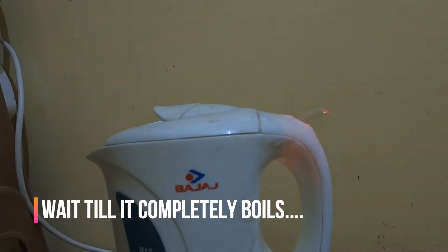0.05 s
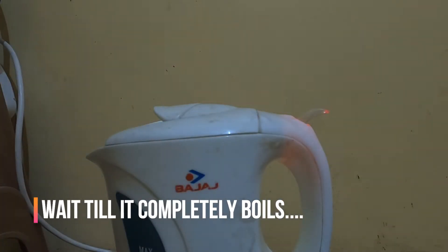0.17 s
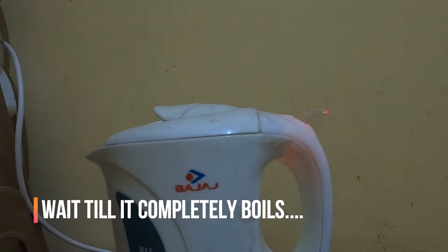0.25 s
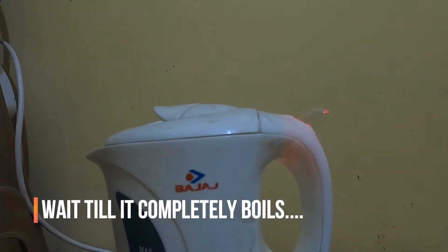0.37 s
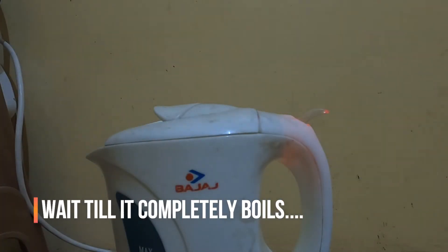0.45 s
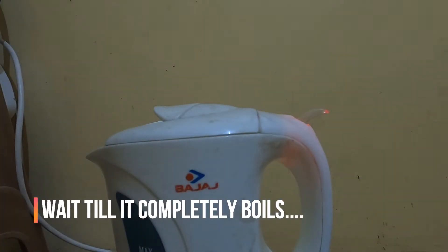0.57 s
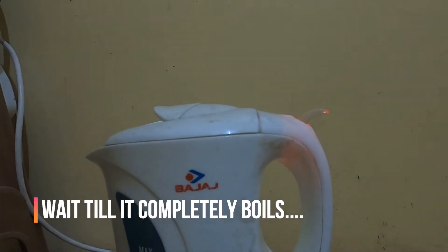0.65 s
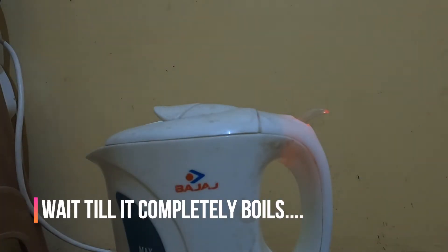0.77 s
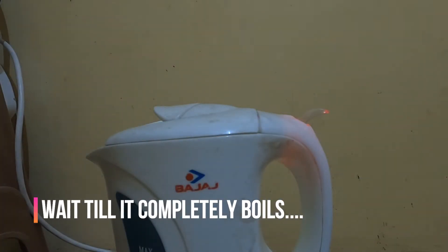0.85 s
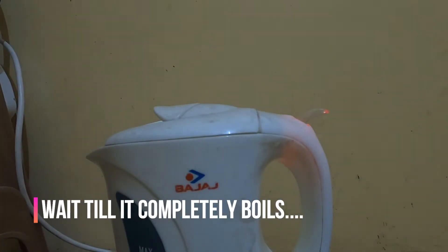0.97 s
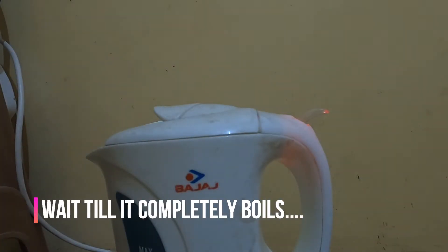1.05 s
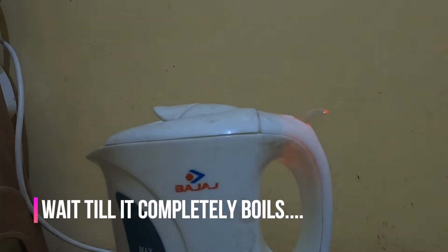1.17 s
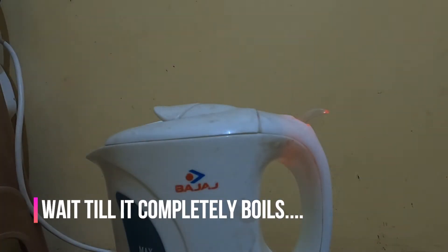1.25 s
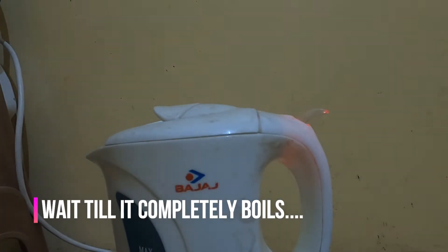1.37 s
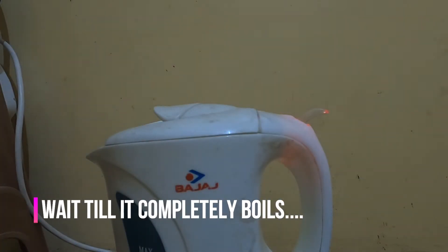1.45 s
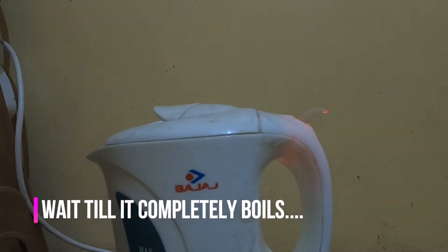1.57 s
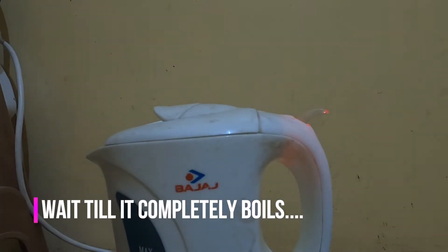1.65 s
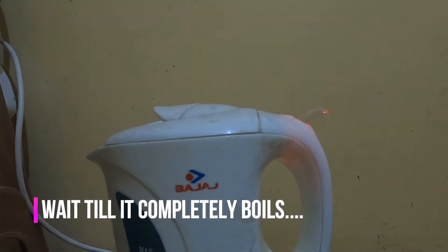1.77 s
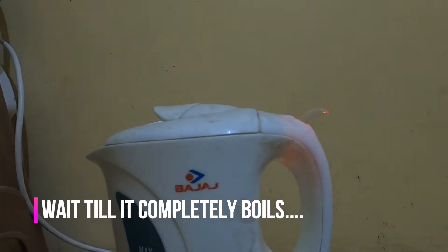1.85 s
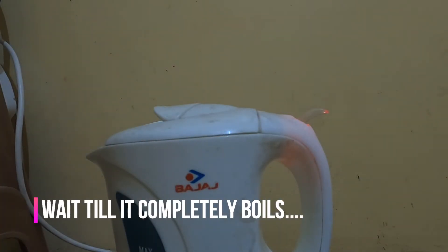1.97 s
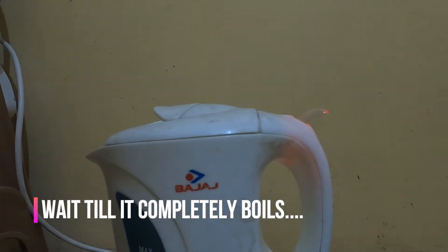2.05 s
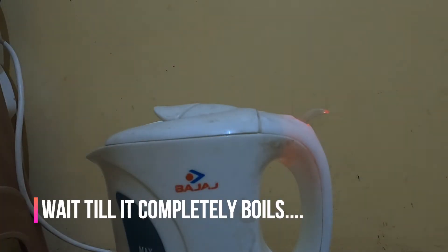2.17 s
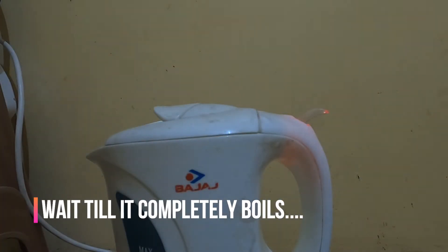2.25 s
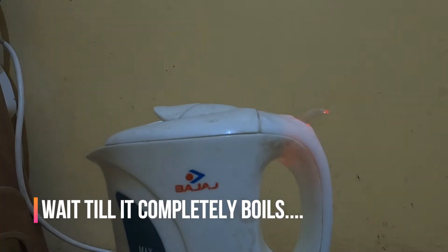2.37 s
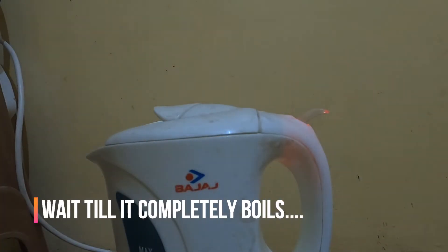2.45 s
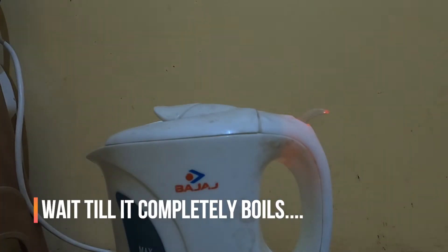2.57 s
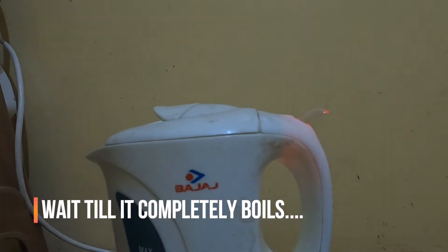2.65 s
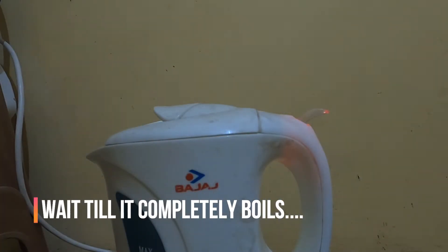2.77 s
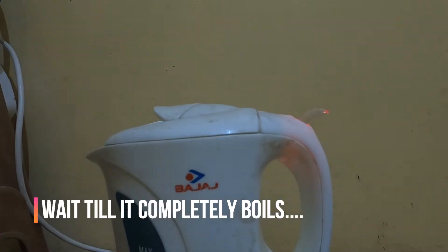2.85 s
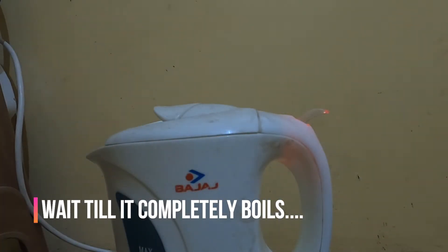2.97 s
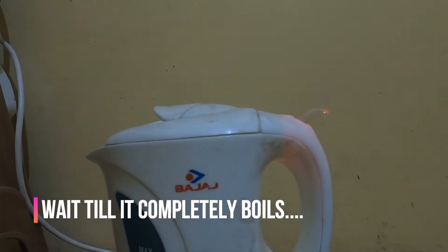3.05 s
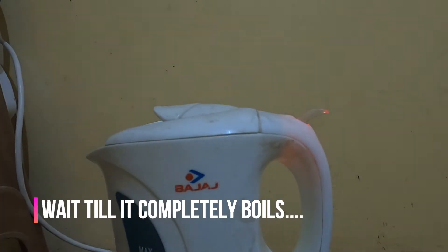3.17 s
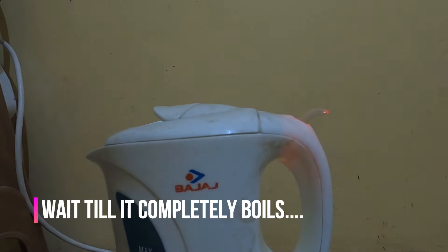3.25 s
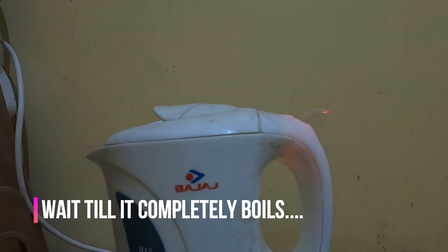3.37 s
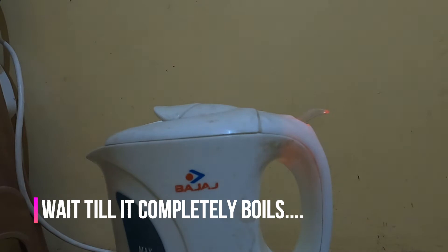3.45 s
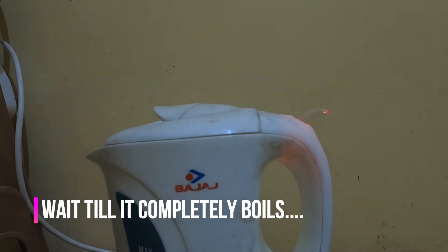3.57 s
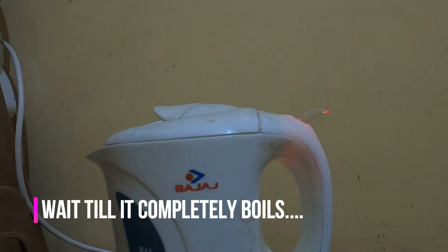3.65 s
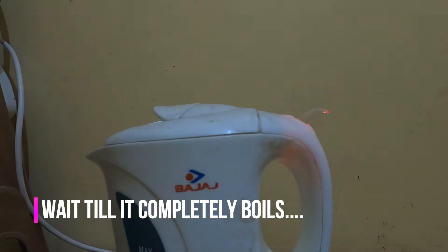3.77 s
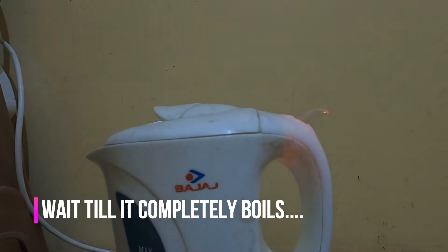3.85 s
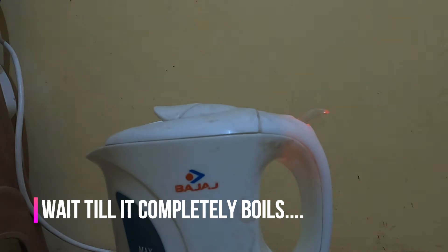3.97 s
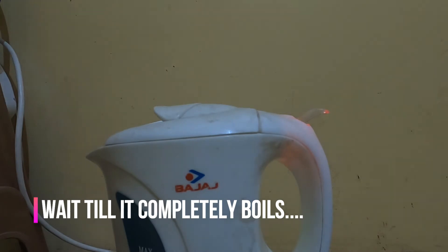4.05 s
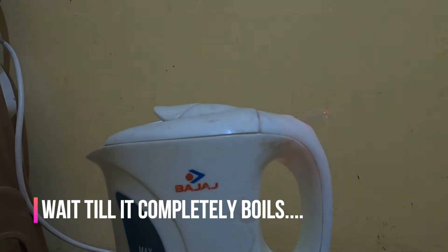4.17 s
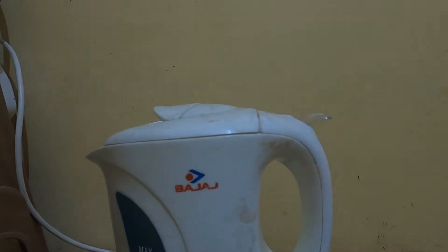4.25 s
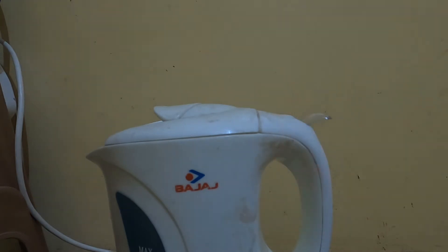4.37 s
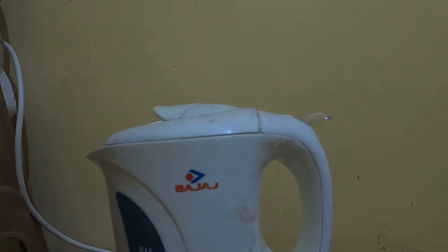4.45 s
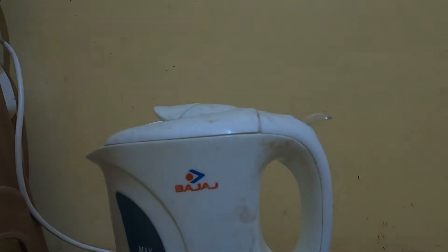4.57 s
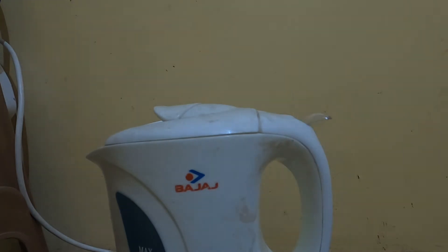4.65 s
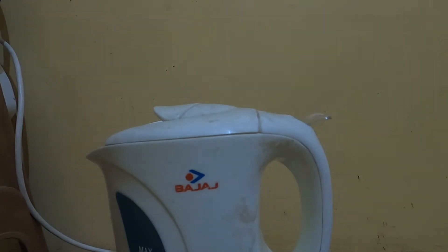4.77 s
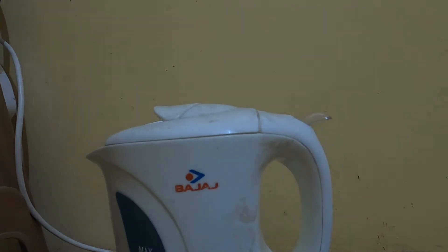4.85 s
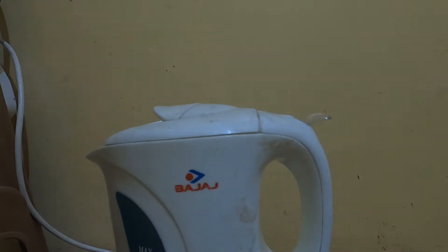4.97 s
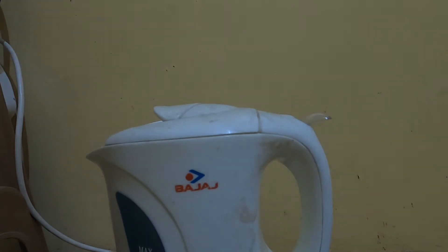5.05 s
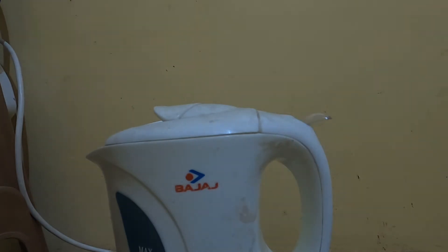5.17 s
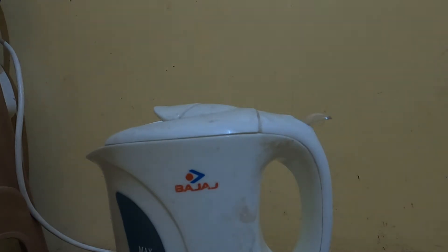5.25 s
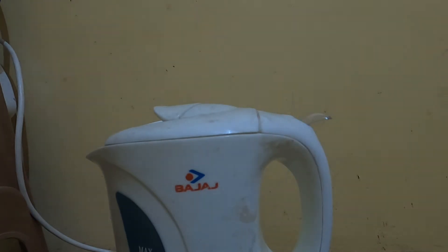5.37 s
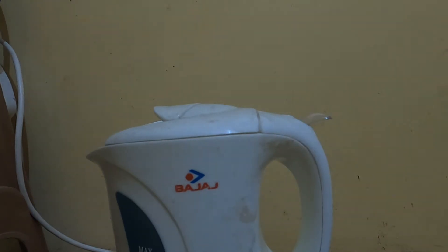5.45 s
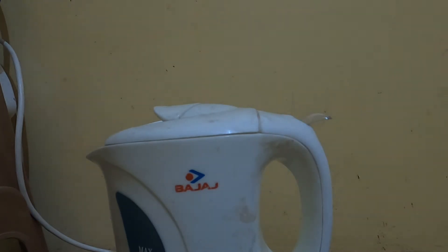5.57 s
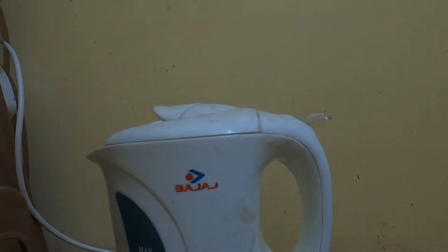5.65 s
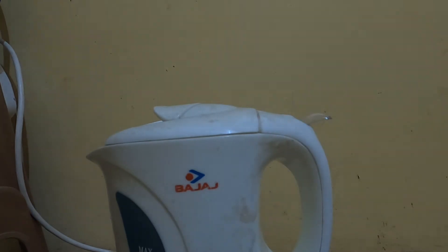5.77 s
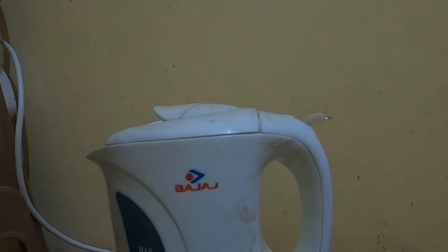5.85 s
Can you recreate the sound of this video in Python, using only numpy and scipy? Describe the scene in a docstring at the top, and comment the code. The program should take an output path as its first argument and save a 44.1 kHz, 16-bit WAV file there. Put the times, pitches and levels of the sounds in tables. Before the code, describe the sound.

Vigorous rolling boil in a plastic kettle in a small hard room, ended by one sharp rattling switch click, then gradually weaker bubbling.

```python
"""A plastic kettle at a rolling boil, heard close up by two microphones in a small hard room, over faint steady
background noise. From the start, steam bubbles thump base and shell, the shell hums, and spray and fizz hiss:
shaped noise. Drops ping, slap and spit under the lid, and larger bubbles gulp with short rising tones.
After about four seconds the switch snaps off: dying tones of lever and spring, a rattle, and treble that
lingers in the room as a grainy hiss. The boil then dies down. Water and snap also ring off the walls."""
import sys
import numpy as np
from scipy import signal
from scipy.fft import rfft, irfft, next_fast_len
from scipy.io import wavfile
from scipy.ndimage import uniform_filter1d, map_coordinates

SR = 44100
rng = np.random.default_rng(int(sys.argv[2]) if len(sys.argv) > 2 else 0)


def unload_wav(signal):
    """Save mono or channel-first audio to the path in sys.argv[1] as 16-bit WAV at rate SR, clipped to [-1, 1]."""
    wavfile.write(
        sys.argv[1],
        SR,
        np.round(np.clip(np.atleast_2d(signal).T, -1, 1) * 32767).astype(np.int16),
    )


N = 260631

# how hard it boils: [t/s, small bubbles in the shell/dB, rocking of the base/dB, large bubbles/dB]
BOIL_STRENGTH = [(0.0, -38, -46, -49), (0.35, -37.5, -46, -44), (0.52, -38.5, -39, -40),
                 (0.99, -38.5, -51, -42.5), (1.23, -37, -44, -44), (1.36, -40, -48, -49),
                 (1.68, -37, -52.5, -41), (2.27, -38.5, -47.5, -42), (2.65, -38.5, -51.5, -41.5),
                 (2.86, -38, -45.5, -43), (3.16, -37, -47, -44.5), (3.85, -36, -43.5, -38.5),
                 (4.0, -39.5, -42, -46), (4.3, -35, -52, -46), (4.61, -40.5, -47.5, -41.5),
                 (4.72, -40, -60, -51), (4.95, -44, -65, -54.5), (5.15, -45.5, -60, -46),
                 (5.35, -44, -58, -50), (5.58, -50, -54, -49), (5.91, -48, -54, -54)]
# tone colour of fizzing steam, droplets and the snap's lingering treble: [f/Hz, relative level/dB]
FIZZ_COLOUR = [(2350, -37), (4000, 0), (5500, -17.5), (6500, -12), (8600, -16.5), (10200, -26),
               (12700, -32.5), (14500, -50)]
# contacts of the switch: [t/s, level/dB, middle of the band that the blow rings f/Hz, rattle level/dB]
SWITCH_CONTACTS = [(4.1916, -22, 2500, -36), (4.1937, -16.5, 1190, -18.5), (4.1966, -18, 2180, -23.5),
                   (4.1989, -7, 3100, -11.5), (4.2001, -20, 1300, -25), (4.2041, -11.5, 620, -23),
                   (4.2109, -27, 1200, -32.5)]


def amp(db):
    """Gain of a level in dB."""
    return 10 ** (np.asarray(db) / 20)


def unit(x):
    """x at rms 1."""
    return x / np.sqrt(np.mean(x ** 2) + 1e-20)


def steadied(x, seconds):
    """x with its swells slower than this time evened out, at rms 1."""
    power = uniform_filter1d(x ** 2, max(round(seconds * SR), 1))
    return x / np.sqrt(np.abs(power) + 1e-12)


def along(points, hz, axis=1):
    """One column of (Hz, value, ..) points, read on a log axis."""
    table = np.transpose(points)
    return np.interp(np.log(hz + 1), np.log(table[0] + 1), table[axis])


def curves(rows):
    """One value per sample for each column after the time."""
    s, *columns = np.transpose(rows)
    return [np.interp(np.arange(N) / SR, s, column) for column in columns]


def wobble(rate):
    """A smooth random curve with this many random points a second."""
    points = rng.standard_normal(int(N * rate / SR) + 4)
    return map_coordinates(points, [np.arange(N) * rate / SR])


def filtered(x, response):
    """x with each frequency scaled and shifted by a complex response."""
    m = next_fast_len(N + SR // 2)
    spectrum = rfft(x, m) * response(np.fft.rfftfreq(m, 1 / SR))
    return irfft(spectrum, m)[..., :N]


def coloured(points, tilt=1):
    """White noise with the relative levels of (Hz, dB) points, their dB scaled by tilt."""
    return filtered(rng.standard_normal(N), lambda hz: amp(tilt * along(points, hz)))


def resonances(table):
    """Response of (Hz, width Hz, dB) resonances, which ring only after a push; signs alternate."""
    def response(f):
        total = 0
        for k, (c, w, db) in enumerate(table):
            total = total + (-1) ** k * amp(db) * 1j * f * w / (c * c - f * f + 1j * f * w)
        return total
    return response


def cushion(top_hz):
    """Response of water softening blows above top_hz."""
    return lambda hz: 1 / (1 + (hz / top_hz) ** 4)


def collapses(share, spread_db, clump_db, clump_rate):
    """Noise with a share of spikes of very uneven but bounded size, coming in clumps."""
    sizes_db = spread_db * np.clip(rng.standard_normal(N), -3.3, 3.3)
    spikes = unit(rng.standard_normal(N) * amp(sizes_db))
    share = np.clip(share, 0, 1)
    mix = np.sqrt(share) * spikes + np.sqrt(1 - share) * rng.standard_normal(N)
    return mix * amp(clump_db * wobble(clump_rate))


def add(track, s, sound):
    """Mixes a sound into the track at s seconds."""
    track[round(s * SR):][:len(sound)] += sound


def burst(t, db, rise_s, t60_s):
    """Loudness curve of a blow: a quick rise, then a fall of 60 dB in t60_s."""
    return amp(db - 60 * t / t60_s) * (1 - np.exp(-t / rise_s))


def ringing(modes, t, turns=1):
    """Rows of dying modes, each at a new strength; phases scatter over a share of a turn."""
    hz, db, t60 = np.transpose(modes)[:, :, None]
    chance = rng.random((2, len(modes), 1))
    level_db = db + 2.9 * (chance[0] - 2.0)
    return hz, amp(level_db - 60 * t / t60) * np.sin(2 * np.pi * (hz * t + turns * chance[1]))


def scattered(count, db, hz, octaves):
    """Rows (s, dB, Hz) of extra events at chance moments; their level follows the boil."""
    when, size, pitch = rng.random((count, 3)).T
    vigour_db = curves(BOIL_STRENGTH)[0][(when * N).astype(int)]
    level_db = vigour_db + db + 8 * (size - .5)
    return np.transpose([when * N / SR, level_db, hz * 2 ** (octaves * (pitch - .5))])


def air():
    """Faint, steady background noise that is nearly the same at both microphones."""
    # colour of the background noise: [f/Hz, relative level/dB]
    air_colour = [(12, -44.5), (20, -7.5), (48, -1), (91, -2.5), (186, -2.5), (246, -4.5), (382, -3.5),
                  (644, -17), (947, -5), (1250, -12.5), (1360, -11), (3970, -27.5), (9080, -52),
                  (14500, -68)]
    common, own = rng.standard_normal(N), rng.standard_normal((2, N))
    return amp(-47.5) * unit(filtered(common + 0.039 * own, lambda hz: amp(along(air_colour, hz))))


def boil():
    """Collapsing steam bubbles drive the base, the shell, the spray and the fizz."""
    # the water column, passed twice: [f/Hz, width of one pass/Hz, level of one pass/dB]
    column_modes = [(80.7, 8, -5), (105.7, 5.5, -3.5), (125.35, 12.8, -3), (191, 13, -6)]
    # resonances of the filled shell: [f/Hz, width/Hz, relative level/dB]
    shell_modes = [(211.6, 33, -2.5), (249, 20.2, -1.5), (282.4, 18, 1.5), (302.2, 19, 2.5),
                   (348.2, 45, -1.5), (429.2, 26.4, -1), (458.7, 10.8, -4), (481.3, 15.7, -3.5),
                   (556.4, 88, -9.5), (603, 4.7, -20), (622, 170, -19.5), (786, 34, -13)]
    # tone colour of the spray: [f/Hz, relative level/dB]
    spray_colour = [(500, -40), (850, -2), (1050, -2), (1170, -3), (1260, -7.5), (1400, -7), (1720, -12.5),
                    (2080, -11), (3290, -19.5), (4180, -27), (5480, -34), (6500, -37), (8450, -72),
                    (14300, -120)]
    spray_under_db, spray_share = -10, 0.44  # against the mean of the small bubbles; share of their swings
    steam_mean_db, steam_share = -72, 0.36  # fizz at the spout; share of the same swings
    vigour_db, base_db, large_db = curves(BOIL_STRENGTH)
    swing_db = vigour_db - vigour_db.mean()
    surge = wobble(16)  # each surge lifts small bubbles, spray and fizz together

    # the kettle rocks on its stand, between about 47 and 120 Hz
    rocking = resonances([(54.7, 10, 0)])
    base = filtered(collapses(0.059, 3.7, .6, 2.8), lambda hz: rocking(hz) ** 2)
    base = filtered(base, lambda hz: cushion(120)(hz) * (1 - cushion(47)(hz)))

    column = resonances(column_modes)
    large = filtered(collapses(0.52, 11.3, 0.63, 11.0), lambda hz: column(hz) ** 2 * cushion(300)(hz))
    small = collapses(0.42, 11.55, 0.55, 32) * amp(0.87 * surge)
    small = filtered(small, lambda hz: resonances(shell_modes)(hz) * cushion(900)(hz))
    spray = collapses(0.61, 13.1, 1.33, 60) * amp(1.0 * surge)
    spray = filtered(spray, lambda hz: amp(along(spray_colour, hz)))
    fizz = collapses(0.21, 15, 4.5, 50) * amp(0.5 * surge)
    fizz = filtered(fizz, lambda hz: amp(along(FIZZ_COLOUR, hz)))

    out = amp(base_db) * steadied(base, 0.24)
    out += amp(large_db) * steadied(large, 0.25)
    out += amp(vigour_db) * steadied(small, 0.24)
    spray_db = vigour_db.mean() + spray_under_db + spray_share * swing_db
    out += amp(spray_db) * steadied(spray, 0.77)
    return out + amp(steam_mean_db + steam_share * swing_db) * steadied(fizz, 0.24)


def sway():
    """The churning water keeps a narrow mode near 160 Hz humming."""
    # level of the hum: [t/s, level/dB]
    hum_level = [(0, -48), (.45, -41), (.65, -48), (.9, -41), (1.5, -42.5), (1.8, -44), (2.2, -43),
                 (2.5, -39), (2.9, -50), (3.3, -41.5), (3.6, -46), (3.8, -40.5), (4.4, -44), (4.9, -50),
                 (5.91, -56.5)]
    mode = resonances([(160.04, 7.7, 0)])  # passed twice
    hum = filtered(rng.standard_normal(N), lambda hz: mode(hz) ** 2)
    return amp(curves(hum_level)[0]) * steadied(hum, 0.13)


def room(x):
    """Walls answer with echoes; each frequency dies at its own speed."""
    # the walls: [f/Hz, time to fall 60 dB t/s, level shared by both microphones/dB, differing part/dB]
    wall_answer = [(60.4, 0.83, -12, -23.5), (260, 0.93, -4.5, -21), (704, 0.93, -3, -10.5),
                   (1900, 0.56, -4.5, -5.5), (5060, 0.68, -4, -1.5), (11800, 0.47, -2.5, -5.5)]
    out, step = np.zeros((2, N + 2 * SR)), SR // 4
    x, fade = np.pad(x, (step, step)), np.hanning(2 * step)
    # the bubbles sit at many places, so each overlapping piece gets its own echo pattern
    for start in range(0, N + step, step):
        hz, t, z = signal.stft(rng.standard_normal((2, SR // 2)), SR, nperseg=256)
        dying = amp(-60 * t / along(wall_answer, hz)[:, None])
        tail = signal.istft(z * dying, SR, nperseg=256)[1]
        tail = tail / np.linalg.norm(tail[0])
        piece = x[start:start + 2 * step]
        wet = signal.fftconvolve((piece * fade[:len(piece)])[None], tail, axes=1)
        out[:, start + 300:][:, :wet.shape[1]] += wet  # echoes begin 300 samples later
    levels = lambda hz: amp([along(wall_answer, hz, axis=2), along(wall_answer, hz, axis=3)])
    shared, differs = filtered(out[:, step:step + N], levels)
    return np.array([shared + differs, shared - differs])


def drops():
    """Each drop pings its small air pockets, slaps, spits, fizzes and knocks the wall."""
    # clearest drops on wall and lid: [t/s, level/dB, f/Hz, knock on wall/dB, spit/dB], last two relative
    clear_drops = [(0.0702, -41.5, 1890, -4, -12), (0.115, -35, 1780, 6.5, -26),
                   (.374, -37.5, 2270, -6, -28), (.4574, -42, 1970, -1, -18),
                   (0.5197, -38.5, 1870, 3.5, -16), (0.583, -32.5, 2430, -5, -17),
                   (0.6482, -34, 1640, -17, -13), (0.7395, -41, 2300, 4.5, -21),
                   (0.7584, -35, 2530, -3, -34), (0.8772, -33, 2140, -6, -17),
                   (0.9589, -35.5, 1680, -4, -26), (1.064, -42, 2200, 7, -24),
                   (1.0947, -26.5, 2170, -14, -31), (1.1282, -39, 1720, -1, -4),
                   (1.256, -34.5, 1880, -1, -15), (1.3743, -38, 2070, -9, -20), (1.4017, -53, 2260, 7, -20),
                   (1.465, -38, 1850, -8, -12), (1.7171, -27, 2320, -13, -11),
                   (1.721, -32.5, 2340, -20, -15), (1.7285, -37.5, 3000, -20, -13),
                   (1.7395, -42, 2700, -20, -13), (1.7665, -44, 2600, -20, -7), (1.9866, -33, 2280, 0, -8),
                   (2.011, -33.5, 1990, -7, -19), (2.0818, -38.5, 1820, -2, -12),
                   (2.133, -45, 2070, 10.5, -20), (2.365, -40, 2090, -16, -7), (2.3855, -35, 1710, -5, -27),
                   (2.4259, -46, 2080, -9, -10), (2.5506, -39, 1980, 2, -15), (2.573, -36, 2150, -3, -10),
                   (2.616, -42.5, 2100, 4, -15), (2.685, -43, 1810, 4, -26), (2.7572, -44, 2020, 7, -25),
                   (3.0977, -34.5, 1680, 0.5, -19), (3.2196, -36, 2230, -6, -24),
                   (3.278, -34.5, 2180, -3, -22), (3.293, -46.5, 3430, -10, -15),
                   (3.347, -32.5, 2090, -7, -35), (3.4755, -37.5, 2000, -16, -22),
                   (3.6064, -47, 1660, 14.5, -14), (3.686, -35, 2020, 0.5, -28),
                   (3.7432, -39.5, 2220, -2, -17), (3.786, -47, 2460, 6, -18),
                   (3.9922, -35, 2410, -1.5, -17), (4.474, -37, 1780, -4, -39), (4.531, -40, 2410, 3, -20),
                   (4.5812, -37, 1960, -5, -15), (4.6964, -35.5, 2140, -3, -19),
                   (5.0435, -38.5, 1830, -10, -18), (5.0948, -37.5, 2080, -16, -14),
                   (5.2348, -38, 2350, -15, -31), (5.2725, -51, 1790, 3, -21), (5.825, -44, 2280, -4, -13)]
    # fine droplets bursting at the spout: [t/s, level/dB]
    droplets = [(.068, -59), (.1226, -55), (0.231, -63.5), (.3027, -60), (.413, -57), (.7377, -57),
                (.9597, -65), (1.1977, -58), (1.276, -62), (1.3044, -60.5), (2.0852, -63), (2.48, -66),
                (2.5316, -62.5), (2.7357, -59), (2.9866, -60), (3.1058, -64), (3.1832, -58), (3.263, -59.5),
                (3.3837, -58), (3.4984, -60), (3.5468, -60), (3.678, -61), (4.142, -56), (5.0444, -61),
                (.2498, -51), (0.381, -56), (0.584, -62), (0.648, -54), (0.779, -53), (0.8765, -58),
                (1.133, -50), (1.165, -53), (1.2176, -69), (1.48, -54), (1.6385, -55.5), (1.718, -58),
                (1.753, -52.5), (1.7854, -57), (1.9135, -55), (1.991, -56), (2.2842, -55), (2.426, -56.5),
                (2.5942, -56), (2.6165, -59), (2.656, -54), (2.754, -66), (2.887, -55), (2.9624, -54.5),
                (3.2784, -55), (3.404, -55.5), (3.9866, -56), (4.1016, -54.5), (4.5795, -67), (4.685, -59),
                (4.79, -60), (4.9197, -59), (5.099, -56)]
    slap_db, fizz_db = -11, -35  # relative to each drop
    out, t = np.zeros(N + SR), np.arange(SR // 16) / SR
    fizz, knock, spit, slap = np.zeros((4, N + SR))
    # many more drops, with knock -5.5 dB and spit -22 dB
    extra = [(*row, -5.5, -22) for row in scattered(count=140, db=-9, hz=2106, octaves=1.097)]
    for s, db, hz, knock_db, spit_db in [*clear_drops, *extra]:
        early = max(s - .001, 0)
        pockets = [(hz, 3, .024), (0.58 * hz, -6, .022), (1.0 * hz, -7, .016), (1.6 * hz, -8, .018)]
        ping = ringing(pockets, t)[1].sum(0)
        add(out, early, amp(db) * (1 - np.exp(-t / 0.00029)) ** 2 * ping)
        add(slap, early, burst(t, db + slap_db, rise_s=.0007, t60_s=0.025))
        add(fizz, s, burst(t, db + fizz_db, rise_s=.001, t60_s=0.052))
        add(knock, s, burst(t, db + knock_db, rise_s=0.0013, t60_s=0.054))
        add(spit, early, burst(t, db + spit_db, rise_s=0.0012, t60_s=0.038))
    for s, db in droplets:
        add(fizz, s, burst(t, db, rise_s=0.0009, t60_s=0.036))

    def band_noise(hz, width_hz):
        """Noise passed twice through one broad resonance."""
        band = resonances([(hz, width_hz, 0)])
        return filtered(rng.standard_normal(N), lambda f: band(f) ** 2)

    near = out[:N] + slap[:N] * steadied(band_noise(2500, 2200), 0.0016)
    near += knock[:N] * steadied(band_noise(1150, 700), 0.0056)
    near += spit[:N] * steadied(band_noise(4200, 2300), 0.0055)
    muffled = filtered(near, lambda hz: 1 / (1 + (hz / 5800) ** 4))  # the lid holds back the treble
    return muffled + fizz[:N] * steadied(coloured(FIZZ_COLOUR, tilt=0.81), .003)


def bubbles():
    """A bubble rings for a few cycles, its pitch rising as it nears the surface."""
    # loudest bubbles bursting at the surface: [t/s, level/dB, starting pitch f/Hz]
    loud_bubbles = [(.117, -44, 1310), (.199, -31.5, 600), (.246, -40, 683), (.36, -34.5, 676),
                    (.638, -28.5, 280), (.699, -30, 334), (.785, -21.5, 327), (.816, -32, 580),
                    (.934, -33.5, 596), (1.063, -35, 566), (1.074, -35, 163), (1.158, -30, 159),
                    (1.165, -34, 900), (1.251, -27, 330), (1.257, -41, 560), (1.297, -31, 153),
                    (1.364, -24.5, 293), (1.402, -33.5, 550), (1.506, -26.5, 164), (1.818, -32.5, 640),
                    (1.987, -40, 624), (2.003, -35, 145), (2.081, -32, 1080), (2.177, -25, 164.4),
                    (2.239, -22.5, 380), (2.327, -37, 353), (2.358, -40, 135), (2.533, -37, 694),
                    (2.652, -30, 331), (2.766, -45, 297), (3.115, -32.5, 1130), (3.199, -26, 341),
                    (3.342, -29, 172), (3.404, -22.5, 328), (3.529, -33, 358), (3.546, -43, 595),
                    (3.606, -29, 570), (3.72, -31, 115), (3.787, -36, 990), (3.796, -23.5, 142),
                    (3.977, -28, 158), (4.132, -30, 623), (4.314, -33, 232), (4.368, -33, 289),
                    (4.415, -37, 910), (4.52, -32.5, 930), (4.705, -32.5, 158), (4.711, -33.5, 930),
                    (4.827, -37, 338), (4.848, -34.5, 1360), (4.993, -32, 474), (5.195, -32.5, 368),
                    (5.27, -40, 295), (5.272, -31, 468), (5.326, -34.5, 273), (5.345, -38, 470)]
    rise_cycles, softness, glide = 1.43, 1.53, 0.0082  # cycles to the peak; shape; extra turns per cycle squared
    out, t = np.zeros(N + SR), np.arange(SR // 6) / SR
    extra = scattered(count=30, db=4, hz=573, octaves=1.9)
    for s, db, hz in [*loud_bubbles, *extra]:
        cycles = hz * t
        shape = (cycles / rise_cycles * np.exp(1 - cycles / rise_cycles)) ** softness
        turns = cycles + glide * cycles ** 2 + rng.random()
        add(out, s, amp(db) * shape * np.sin(2 * np.pi * turns))
    return out[:N]


def switch():
    """The spring throws the lever over in a quick rattle; each blow rings its own band of modes."""
    # lever and handle: [f/Hz, relative level/dB, time to fall 60 dB t/s]
    lever_modes = [(593, 8.5, 0.024), (780, -12, .008), (1070, 0, 0.048), (1290, -2, 0.024),
                   (1610, -11.5, 0.016), (1980, 2, 0.014), (2330, -5, 0.017), (2640, -4, 0.0092),
                   (3080, -6, 0.011), (3320, 1, 0.011), (3570, 2, 0.0079), (4050, -18, 0.008),
                   (4600, -7, .008)]
    # thin steel spring, its modes in close pairs: [f/Hz, level/dB, time to fall 60 dB t/s]
    spring_modes = [(6720, -58, .4), (6745, -61, .4), (7640, -59, .45), (7665, -62, .45)]
    # tone colour of loose plastic parts: [f/Hz, relative level/dB]
    rattle_colour = [(240, -34), (400, -10), (600, 0.5), (848, -41), (1080, -4.5), (1410, -4), (1740, -9),
                     (2390, -3), (3380, -11), (5630, -27), (6540, -21.5), (8190, -18.5), (14500, -43)]
    lever_db, half_width_octaves = -8.5, 0.95  # relative to each contact; where a blow's band has half gain
    out, shake, t = np.zeros(N + SR), np.zeros(N + SR), np.arange(SR // 4) / SR
    for s, db, middle_hz, rattle_db in SWITCH_CONTACTS:
        hz, lever = ringing(lever_modes, t, turns=0.12)
        lever = lever / (1 + (np.log2(hz / middle_hz) / half_width_octaves) ** 4)
        spring = ringing(spring_modes, t)[1].sum(0)
        add(out, s, (1 - np.exp(-t / 0.00018)) * (amp(db + lever_db) * lever.sum(0) + spring))
        add(shake, s, burst(t, rattle_db, rise_s=0.00026, t60_s=0.0096))
    rattle = steadied(coloured(rattle_colour), 0.0042)
    softened = filtered(out[:N], lambda hz: 1 / (1 + (hz / 12000) ** 6))
    return softened + shake[:N] * rattle


def treble_tail():
    """The snap's treble lingers in the room as a grainy hiss: it swells, holds, then falls ever faster."""
    level_db, rise_s, gone_s = -54.5, .02, 0.33  # gone_s: time to fall 60 dB
    own_part = .8  # part that differs between the microphones
    t = np.clip(np.arange(N) / SR - SWITCH_CONTACTS[0][0], 0, None)
    common, *own = [collapses(.3, 8, 2, 64) for _ in range(3)]
    grains = common + own_part * np.array(own)
    grains = filtered(grains, lambda hz: amp(0.49 * along(FIZZ_COLOUR, hz)))
    return amp(level_db - 60 * (t / gone_s) ** 2) * (1 - np.exp(-t / rise_s)) * unit(grains)


def snap_to_walls():
    """The main blow as it reaches the walls: one click, its modes blurred by the housing."""
    # tone colour of the snap towards the walls: [f/Hz, level/dB]
    snap_colour = [(300, -25), (550, 10), (800, 0.5), (1100, 14.5), (1500, 14.5), (2000, 6.5), (2460, 10),
                   (3200, 8), (4200, -2.5), (5350, -7.5), (7000, -6), (8800, -10), (10300, -25),
                   (13300, -30), (14500, -61)]
    blow = np.zeros(N)
    blow[round(4.199 * SR)] = 1
    return filtered(blow, lambda hz: amp(along(snap_colour, hz)))


def heard(x, lean):
    """A source reaches the right microphone 34 microseconds before the left."""
    side = np.array([[.5], [-.5]])
    return filtered(x, lambda hz: amp(side * along(lean, hz)) * np.exp(-2j * np.pi * hz * side * 3.4e-5))


def scene():
    """Water and switch, straight and off the walls, over the background noise."""
    # balance of the water: [f/Hz, left minus right level/dB]
    water_lean = [(60, 0.5), (400, 1.25), (700, 0), (2300, 4), (4200, 4), (8000, -3)]
    # balance of the switch, which sits to the right: [f/Hz, left minus right level/dB]
    snap_lean = [(600, 1), (2300, -1.5), (4200, 0), (8000, -5.5)]
    water = boil() + sway() + bubbles()
    spatter = drops()
    snap = switch() + treble_tail()
    walls = room(water + amp(-4.5) * spatter + snap_to_walls())  # drops reach the walls weaker than the boil
    return heard(water + spatter, water_lean) + heard(snap, snap_lean) + walls + air()


def record(dry):
    """The microphones keep nothing from 14700 Hz up."""
    return filtered(dry, lambda hz: hz < 14700)


dry = scene()
out = record(dry)
unload_wav(out)
```